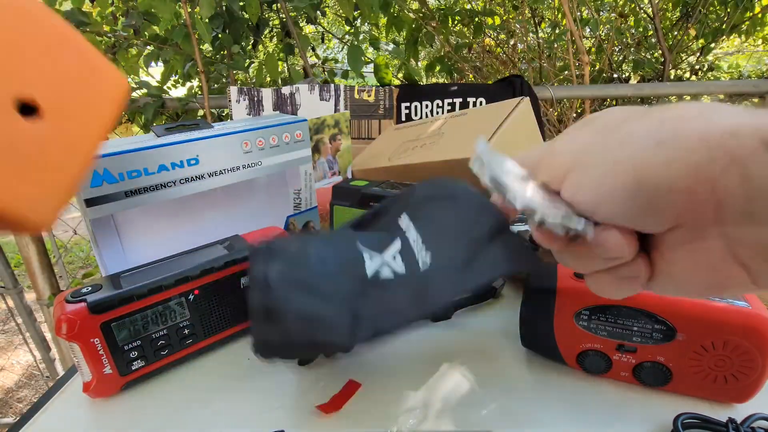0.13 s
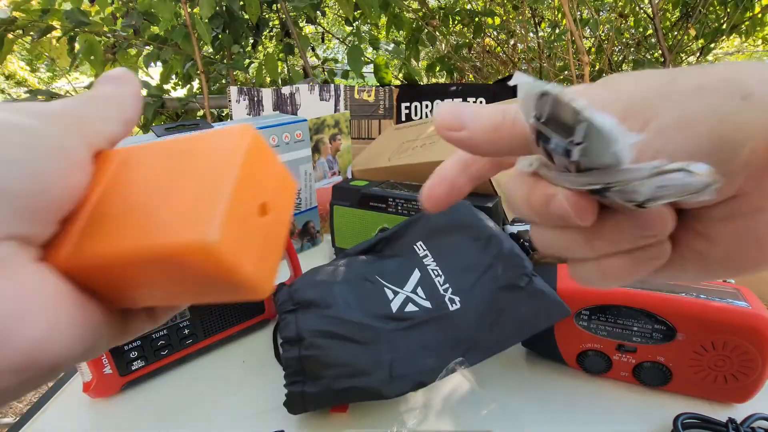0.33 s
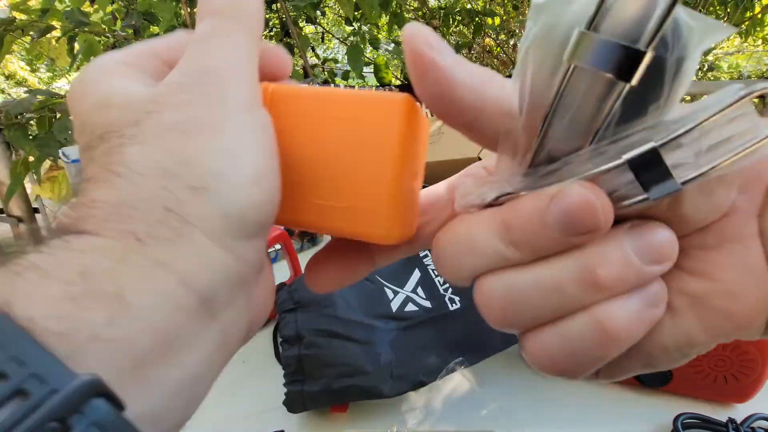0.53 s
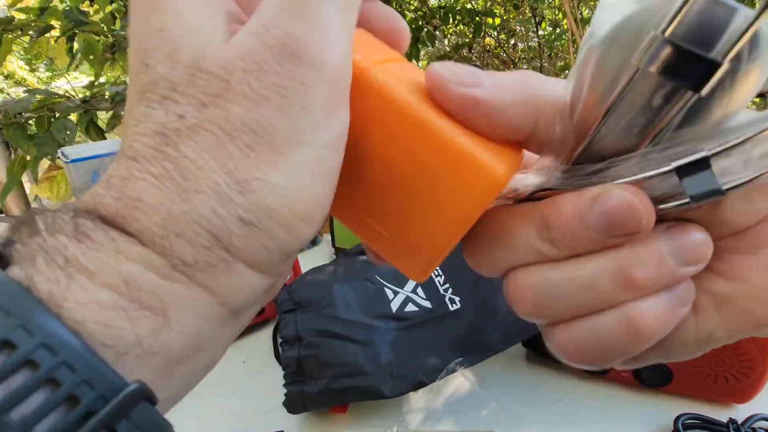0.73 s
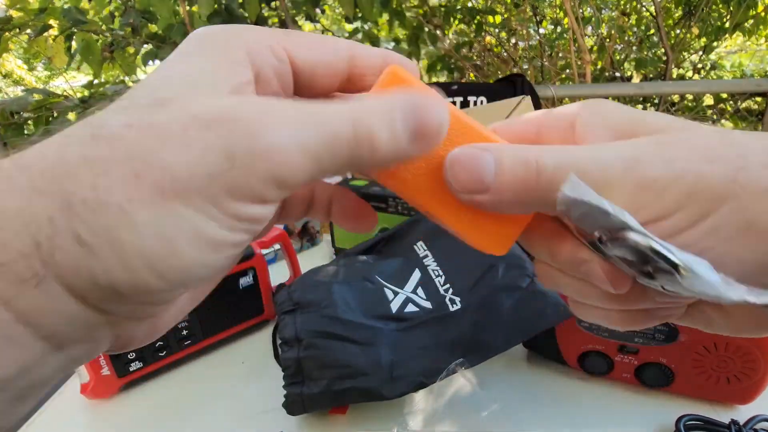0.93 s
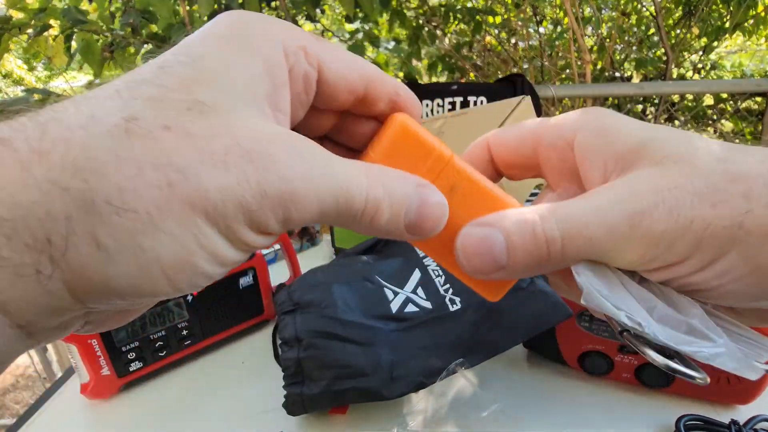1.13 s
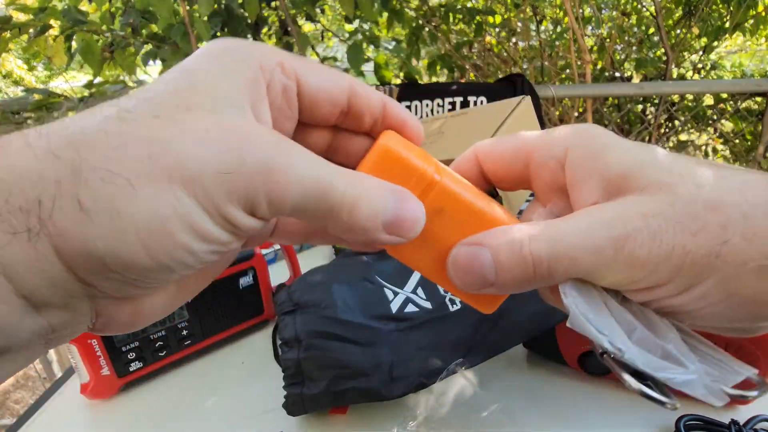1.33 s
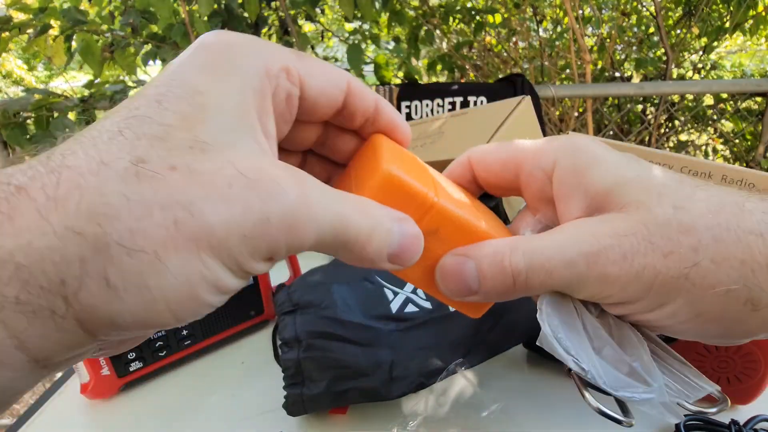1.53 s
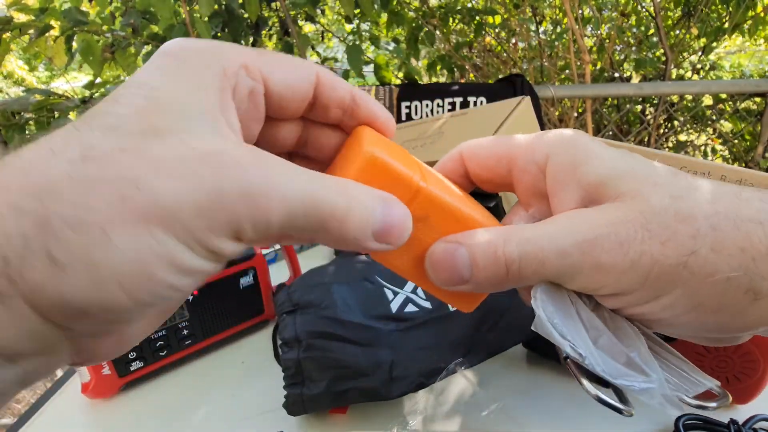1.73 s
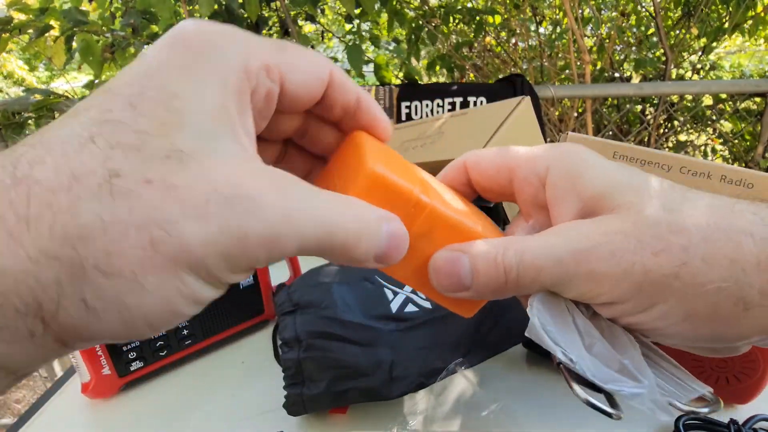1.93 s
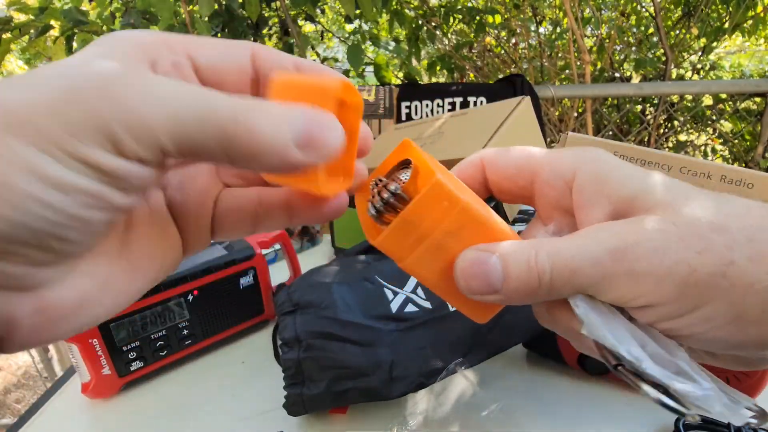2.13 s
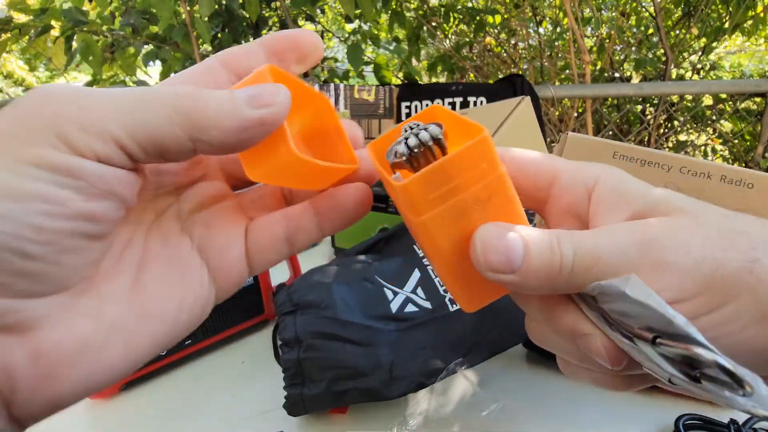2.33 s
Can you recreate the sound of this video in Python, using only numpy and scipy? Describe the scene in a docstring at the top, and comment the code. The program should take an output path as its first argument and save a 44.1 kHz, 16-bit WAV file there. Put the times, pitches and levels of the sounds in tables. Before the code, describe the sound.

Plastic case handled and its tight lid popped off close by, after sharp clacks of folded steel cutlery

```python
"""Opening a plastic cutlery case

Two hands turn a small hollow plastic case close by and pull its lid off. Knocks and stick-slip scrapes excite
the resonances of its air and walls, with short squeaks from the freed lid. Folded steel cutlery clacks through
its own resonances, and a thin wrapper ticks and rustles as snaps and hiss.
Outdoors, shaped noise makes a far low rumble, a wavering hum, air and a thin band of insects."""
import sys
import numpy as np
from scipy import signal
from scipy.fft import rfft, irfft, next_fast_len
from scipy.io import wavfile
from scipy.ndimage import map_coordinates

SR = 44100
rng = np.random.default_rng(int(sys.argv[2]) if len(sys.argv) > 2 else 0)


def file_out(sig):
    """Save sig as 16-bit WAV at sys.argv[1]."""
    # one column per channel
    cols = np.atleast_2d(sig).T
    # limit, then scale
    lim = np.clip(cols, -1, 1)
    pcm = np.round(lim * 32767).astype(np.int16)
    wavfile.write(sys.argv[1], SR, pcm)


N = 110250

# Resonances of the case; columns: centre_hz, width_hz, gain_db
# air in the case
CAVITY_MODES = [(242, 121, 9), (476, 230, -15)]
# broad walls
BROAD_WALL_MODES = [(748, 116, 8), (820, 143, 7), (963, 72, 0.5)]
# narrow walls and lid
UPPER_WALL_MODES = [(1060, 131, 2), (1345, 266, 2), (2150, 142, -1.5)]
# treble
TREBLE_MODES = [(2610, 390, 2), (3520, 380, -0.5), (4800, 1070, -8.5), (5600, 280, -68), (6450, 450, -39),
                (8330, 8100, -17), (12940, 14000, -20)]
CASE_LEAD_S = 0.00019  # sound reaches the left side first


def case():
    """Plastic case: knocks and slips drive its air, broad walls, upper walls and treble resonances."""
    air_force, *wall_forces = knocks() + slips()
    wall_modes = [BROAD_WALL_MODES, UPPER_WALL_MODES, TREBLE_MODES]
    shell = sum(ringing(force, modes) for force, modes in zip(wall_forces, wall_modes))
    cavity = ringing(air_force.mean(axis=0), CAVITY_MODES)  # the same on both sides
    return nearby(thin(shell) + cavity, CASE_LEAD_S)


# Knocks on the case; levels are relative, before the drive gain and the resonances
# columns: hit_s, level_db, t60_s, cavity_db, upper_walls_db, treble_db, left_over_right_db
KNOCKS = [(0.024, -42, 0.0076, 5, -11, -10, -6), (.045, -39.5, 0.032, -5, -9, -4.5, 18),
          (.058, -33, 0.0098, 1, 3, 1, 4.5), (.093, -61.5, 0.01, -9, -4, 12, -14),
          (0.354, -47.5, 0.031, -24, 9, -12, -1), (.471, -57.5, 0.02, -31, 11, 16, -9.5),
          (.637, -33, 0.014, 6.5, 7, 4.5, 7), (.849, -19, .005, -17, -10.5, -32, 8.5),
          (0.89, -51, 0.0083, -7, 10, -15, -4), (1.088, -51.5, 0.018, 0, 2, 5, -9),
          (1.174, -45, 0.052, 7, 3, 4.5, 13), (1.575, -34.5, 0.02, -8.5, -10, -12, 7),
          (2.0415, -14, 0.008, -3, 5.5, 4, 5), (2.087, -41.5, 0.0092, -3, -2, -7, 7),
          (2.142, -44.5, 0.015, -22, 15, -25, 6), (2.1959, -11.5, 0.012, 3.5, 0, -10, 7.5),
          (2.216, -18, 0.026, -30, -18, -5, 7)]


def knocks():
    """Blows on the case: chatter shakes only the walls, the sharp push also moves the air inside."""
    force = np.zeros((4, 2, N))
    for hit_s, level_db, t60, cavity_db, walls_db, treble_db, left_db in KNOCKS:
        chatter, push = blow(t60, chatter=0.15)
        contact = push + chatter * [[0], [1], [1], [1]]
        gains = group_gains(level_db + 25, cavity_db, 0, walls_db, treble_db)
        add(force, hit_s - 0.01, gains * contact, left_db)
    return force


# The lid slips on its seat; levels are relative, rise_share is held within 0.05-0.95 when played
# columns: start_s, length_s, level_db, cavity_db, upper_walls_db, treble_db, rise_share (0-1), slip_rate_hz
SLIPS = [(1.362, 0.03, -45.5, -13.5, -7, -11, 0.1, 778), (1.586, 0.029, -42, -19, -6.5, -14.5, 0.96, 871),
         (1.884, 0.032, -40, -12.5, -6, -14.5, 0.25, 850.6), (2.005, 0.039, -48.5, -14, -5.5, -9, .5, 820),
         (2.047, 0.016, -48, 6.5, 6, 8.5, 0, 1200), (2.146, 0.049, -35.5, -20, -7, -11, 0.39, 777),
         (2.196, 0.026, -40.5, -4, 4, 1.5, 0.33, 726), (2.217, 0.051, -46.5, -29, 6, -4, 0.32, 1074),
         (2.269, 0.023, -50.5, -18, -1, -3, 0.86, 752), (2.323, 0.011, -53.5, -22, -3, -2.5, 0.55, 773)]
SLIP_LEFT_DB = 4.5  # left over right
SLIP_JITTER, SLIP_RASP = 0.2, 0.68  # scatter of the slip rate; mix weight of fine rasp


def slips():
    """Stick-slip friction: an unsteady train of jerks mixed with fine rasp, swelling and fading."""
    force = np.zeros((4, 2, N))
    wander, rasp = wobble(500), rng.standard_normal(N)
    for start_s, length_s, level_db, cavity_db, walls_db, treble_db, rise, slip_hz in SLIPS:
        n, first = round(length_s * SR), round(start_s * SR)
        span = slice(first, first + n)
        cycles = np.cumsum(slip_hz * (1 + SLIP_JITTER * wander[span])) / SR
        jerks = unit(np.diff(np.floor(cycles), prepend=0))  # one jerk per whole cycle
        grains = (1 - SLIP_RASP) * jerks + SLIP_RASP * rasp[span]
        peak = np.clip(rise, 0.05, 0.95)
        ramp = np.interp(np.arange(n) / n, [0, peak, 1], [0, 1, 0])
        swell = np.sin(np.pi / 2 * ramp)
        gains = group_gains(level_db + 22.5, cavity_db, 0, walls_db, treble_db)
        add(force, start_s, gains * swell * grains, SLIP_LEFT_DB)
    return force


# The freed lid squeaks on the rim; columns: middle_s, length_s, pitch_hz, level_db
SQUEAKS = [(2.244, .014, 1230, -37), (2.291, .011, 1330, -34), (2.332, .011, 1290, -34)]


def squeaks():
    """Rubbing lid: short sine tones with a slightly unsteady phase that swell and fade."""
    t = np.arange(N) / SR
    tones = np.zeros(N)
    for middle_s, length_s, pitch_hz, level_db in SQUEAKS:
        swell = np.exp(-(2 * (t - middle_s) / length_s) ** 2)
        tones += amp(level_db) * swell * np.sin(2 * np.pi * pitch_hz * t + 0.25 * wobble(100))
    return nearby(tones * sides(SLIP_LEFT_DB), CASE_LEAD_S)


# The cutlery clacks; levels are relative, before the drive gain and the resonances
# columns: hit_s, level_db, t60_s, handles_db, treble_db, left_over_right_db
CLACKS = [(0.216, -5, 0.0051, -5, 2.5, -3.5), (0.2314, -20, 0.014, 3, 5, 11.5),
          (0.296, -8.5, 0.0068, -3, -2.5, 0)]
# Resonances of the steel; columns: centre_hz, width_hz, gain_db
# the long handles
HANDLE_MODES = [(817, 270, -5.5), (1330, 360, -6.5)]
# the main body of the sound
STEEL_MODES = [(1815, 142, 5), (3010, 360, -0.5), (3580, 324, 1), (4680, 370, -7.5), (5220, 370, -13)]
# treble
STEEL_TREBLE_MODES = [(6280, 170, -10.5), (7500, 1450, -23.5), (11600, 18000, -50)]
RING_HZ, RING_DB, RING_T60_S = 5308, -17, 0.18  # the thin mode that rings on
STEEL_LEAD_S = 0.00017


def cutlery():
    """Folded steel: parts clack together and drive three groups of resonances; one thin mode rings on."""
    force = np.zeros((3, 2, N))
    for hit_s, level_db, t60, handles_db, treble_db, left_db in CLACKS:
        contact = sum(blow(t60, chatter=0.18))
        add(force, hit_s - 0.01, group_gains(level_db + 25.5, handles_db, 0, treble_db) * contact, left_db)
    handles, main, treble = force
    ring_width_hz = np.log(1000) / np.pi / RING_T60_S  # the width that gives this decay
    ring = ringing(treble, [(RING_HZ, ring_width_hz, RING_DB)])
    body = ringing(handles, HANDLE_MODES) - ringing(main, STEEL_MODES)
    return nearby(thin(body) + ringing(treble, STEEL_TREBLE_MODES) + ring, STEEL_LEAD_S)


# The wrapper's clearest ticks, relative levels; columns: hit_s, level_db, left_over_right_db
TICKS = [(0.0154, -33, 11), (0.0385, -39, -17), (0.0591, -31, 3), (0.0996, -40, 2), (0.175, -40.5, -1),
         (0.4519, -31.5, -7), (0.4918, -32.5, 6), (0.5084, -38, 13), (0.5946, -41, 14), (0.677, -45.5, 15),
         (0.707, -40, 18), (0.755, -45, -5), (0.7996, -38, 10.5), (0.9764, -42, 9), (1.042, -43, 4),
         (1.075, -44.5, -4), (1.0956, -44.5, 11), (1.1947, -46, 15), (1.2417, -33.5, -3),
         (1.3605, -39.5, 1), (1.3683, -36, -2), (1.4114, -41.5, 10), (1.432, -55, 21), (1.517, -50, 13),
         (1.555, -41.5, 8), (1.6207, -47, 18), (1.6533, -43.5, -10.5), (1.6668, -52, 15), (1.7045, -41, -5),
         (1.7446, -50, 8), (1.8337, -42, 2), (1.85, -51, 13), (1.901, -44.5, 29), (1.9395, -44.5, 3),
         (2.4898, -45, 13)]
# How hard the wrapper is crumpled, relative levels; columns: time_s, level_db
CRUMPLE = [(0, -34.5), (.02, -43.5), (.06, -46.5), (.07, -66), (.17, -70), (.205, -41.5), (.25, -41.5),
           (.33, -43.5), (.37, -56), (.45, -46.5), (.52, -54.5), (.56, -52), (.61, -52), (.72, -55),
           (.74, -60.5), (.8, -50.5), (.9, -55.5), (.93, -72), (1.16, -71), (1.2, -53), (1.3, -58),
           (1.45, -100), (1.8, -86), (2.1, -63.5), (2.3, -61.5), (2.45, -68), (2.5, -47)]
# Colour of the film, normalised when played; columns: frequency_hz, gain_db
FILM_COLOUR = [(600, -9.5), (1500, -2.5), (3000, 2.5), (5300, -3), (7000, -12), (9500, -12), (13500, -15.5),
               (15900, -6)]
FILM_LEAD_S = 0.00016


def wrapper():
    """Thin film: single ticks over a rustle of hiss and tiny random crackles, all in one colour."""
    ticks, spike = np.zeros((2, N)), np.zeros(N)
    for hit_s, level_db, left_db in TICKS:
        add(ticks, hit_s - 0.01, amp(level_db + 9) * sum(blow(0.012, chatter=0.21)), left_db)
    grain = amp(0.5) * crackle() + amp(-7) * noise_pair(0.2)
    rustle = level(CRUMPLE) * amp(2 * wobble(90)) * grain
    spike[N // 2] = 1
    film_gain = np.linalg.norm(coloured(spike, FILM_COLOUR))
    return nearby(coloured(ticks + rustle, FILM_COLOUR) / film_gain, FILM_LEAD_S)


# Edges between four crease sizes: small creases crackle high, large ones low; column: edge_hz
CREASE_EDGES = [2510, 4760, 8550]
# rate per crease size, the same snaps on both sides; mean of the random boost before rounding
SNAPS_PER_S, SNAP_SPREAD_DB = 260, 6.5


def crackle():
    """Buckling creases: random snaps sound in the band of their size, and some snap through all."""
    shape = (len(CREASE_EDGES) + 2, N)
    happens = rng.random(shape) < SNAPS_PER_S / SR
    strength = amp(SNAP_SPREAD_DB * rng.exponential(size=shape))
    snaps = np.tanh(happens * strength * rng.choice([-1, 1], shape) / 9)  # rounds off the strongest
    edges = [0, *CREASE_EDGES, SR]

    def split(hz):
        return np.array([(hz >= low) & (hz < high) for low, high in zip(edges, edges[1:])])

    bands = filtered(snaps[1:], split)
    return unit(0.7 * snaps[0] + bands.sum(axis=0))


# Colour of the far rumble; columns: frequency_hz, gain_db
RUMBLE_COLOUR = [(12, -60), (20, -27), (36, -25), (59, -8), (123, -5.5), (216, -13), (255, -5),
                 (416, -26.5), (441, -37), (700, -65), (910, -59), (1540, -120)]
# The hum wavers; columns: time_s, level_db
HUM_LEVEL = [(0.0, -24), (0.03, -51), (0.31, -47), (0.34, -59.5), (0.71, -43), (0.84, -62.5), (1.09, -49),
             (1.16, -54.5), (1.61, -46), (1.85, -63), (1.95, -52.5), (2.5, -53.5)]
# Colour of the air; columns: frequency_hz, gain_db
AIR_COLOUR = [(300, 1), (480, 3.5), (620, -5), (800, -1.5), (1100, -5), (1600, -8.5), (4280, -13.5),
              (6500, -23.5), (9360, -30), (14200, -31), (15900, -26)]
RUMBLE_DB, AIR_DB, INSECT_DB = -48.5, -56, -78.5  # levels around which rumble and air waver; insects steady
HUM_HZ, HUM_WIDTH_HZ = 58.2, 3.5
INSECT_HZ, INSECT_WIDTH_HZ = 8190, 420  # width of each of two passes


def outdoors():
    """Background of shaped noise: a lumpy far rumble, a wavering hum, air hiss and a thin insect band."""
    rumble = amp(RUMBLE_DB + 2 * wobble(7)) * unit(coloured(noise_pair(0.87), RUMBLE_COLOUR))
    hum = level(HUM_LEVEL) * unit(ringing(noise_pair(0.82), [(HUM_HZ, HUM_WIDTH_HZ, 0)]))
    air = amp(AIR_DB + 0.41 * wobble(12.95)) * unit(coloured(noise_pair(0.043), AIR_COLOUR))
    band = [(INSECT_HZ, INSECT_WIDTH_HZ, 0)]
    insects = amp(INSECT_DB) * unit(ringing(ringing(noise_pair(0.18), band), band))
    return rumble + hum + air + insects


LEAD_IN_S, LEAD_IN_DB = 0.0052, -5  # the lead-in noise climbs 20 dB in this time, up to this level


def blow(t60, chatter):
    """Contact: a soft noise lead-in, then a sharp push and dying chatter; the push comes 10 ms in."""
    t = (np.arange(SR // 12) - SR // 100) / SR
    shape_db = np.where(t < 0, LEAD_IN_DB + 20 * t / LEAD_IN_S, -60 * t / max(t60, 0.002))
    push = 1 * (t == 0)
    return chatter * rng.standard_normal(len(t)) * amp(shape_db), push


SCATTER_DB, SCATTER_T60_S = -13, 0.02  # off table, boxes and hands


def nearby(x, lead_s):
    """Close source: the left side hears it a moment before the right, each with its own scatter."""
    t = np.arange(SR // 10) / SR
    tail = rng.standard_normal((2, len(t))) * amp(-60 * t / SCATTER_T60_S) * (t > 0.001)
    wet = signal.fftconvolve(x, tail / np.linalg.norm(tail[0]), axes=1)[:, :N]
    shift_s = lead_s / 2 * np.array([[1], [-1]])
    return filtered(x + amp(SCATTER_DB) * wet, lambda hz: np.exp(2j * np.pi * hz * shift_s))


FLOOR_HZ = 680  # walls and steel are too small to radiate below this


def thin(x):
    """Weak radiation: a small stiff object gives no bass, so three equal high-passes run in series."""
    def high_pass(hz):
        ratio = FLOOR_HZ / (hz + 1)
        return (1 / (1 - ratio ** 2 - 1.2j * ratio)) ** 3

    return filtered(x, high_pass)


def ringing(x, peaks):
    """Resonator bank: x through (centre Hz, width Hz, dB) peaks of alternating sign."""
    def response(f):
        total = 0
        for k, (centre, width, db) in enumerate(peaks):
            total = total + (-1) ** k * amp(db) * 1j * f * width / (centre ** 2 - f * f + 1j * f * width)
        return total

    return filtered(x, response)


def coloured(x, points):
    """Tone curve: x through (Hz, dB) points on a log frequency axis."""
    f, db = np.transpose(points)
    return filtered(x, lambda hz: amp(np.interp(np.log(hz + 1), np.log(f + 1), db, -120, -120)))


def filtered(x, response):
    """Spectrum of x times a complex response of frequency."""
    m = next_fast_len(N + SR // 2)
    return irfft(rfft(x, m) * response(np.fft.rfftfreq(m, 1 / SR)), m)[..., :N]


def noise_pair(alike):
    """Two noises of a given left-right likeness."""
    a, b = rng.standard_normal((2, N))
    u = np.arccos(np.clip(alike, 0, 1)) / 2
    return np.array([np.cos(u) * a + np.sin(u) * b, np.cos(u) * a - np.sin(u) * b])


def wobble(rate):
    """A smooth random curve, rate knots a second."""
    return map_coordinates(rng.standard_normal(int(N * rate / SR) + 4), [np.arange(N) * rate / SR])


def level(rows):
    """A (s, dB) curve as gain."""
    s, db = np.transpose(rows)
    return amp(np.interp(np.arange(N) / SR, s, db))


def add(track, s, force, left_db):
    """Lays a force into a stereo track at s."""
    part = track[..., max(round(s * SR), 0):][..., :force.shape[-1]]
    part += (force[..., None, :] * sides(left_db))[..., :part.shape[-1]]


def sides(left_db):
    """Left and right gains, left_db apart."""
    return amp([[left_db / 2], [-left_db / 2]])


def group_gains(level_db, *group_db):
    """A column of gains, one for each group of resonances."""
    return amp(level_db + np.array(group_db)[:, None])


def amp(db):
    """Decibels to gain."""
    return 10 ** (np.asarray(db) / 20)


def unit(x):
    """x scaled to an RMS of 1."""
    return x / np.sqrt(np.mean(x ** 2) + 1e-20)


def scene():
    """Case, lid squeaks, cutlery and wrapper over the outdoor background."""
    return case() + squeaks() + cutlery() + wrapper() + outdoors()


CLIP_TOP, CLIP_KNEE, TOP_HZ = 0.95, 4, 16500  # ceiling (full scale = 1), knee sharpness, band limit


def record(dry):
    """The loudest blows round off near full scale; nothing is kept above the band limit."""
    soft = dry / (1 + np.abs(dry / CLIP_TOP) ** CLIP_KNEE) ** (1 / CLIP_KNEE)
    return filtered(soft, lambda hz: hz < TOP_HZ)


dry = scene()
out = record(dry)
file_out(out)
```